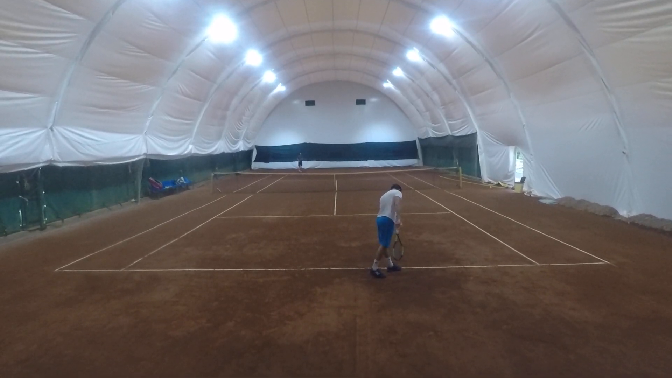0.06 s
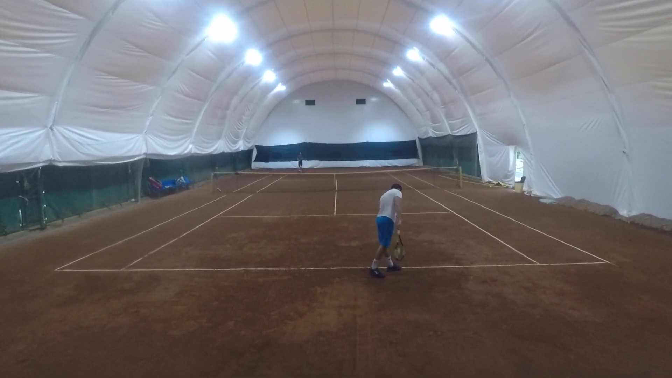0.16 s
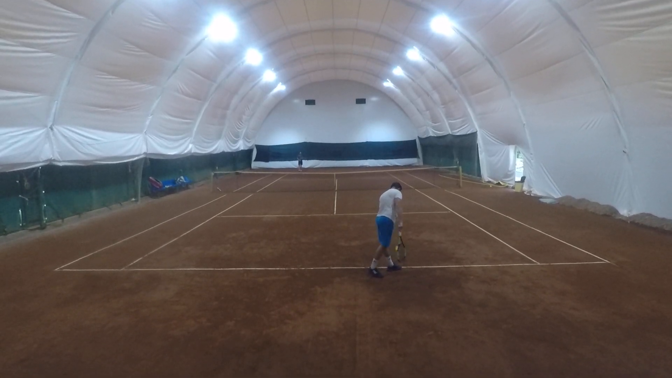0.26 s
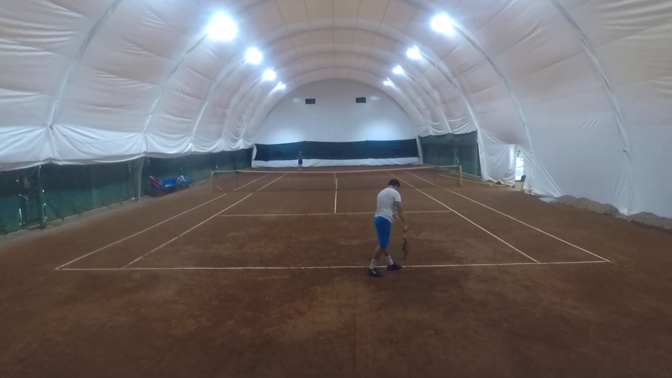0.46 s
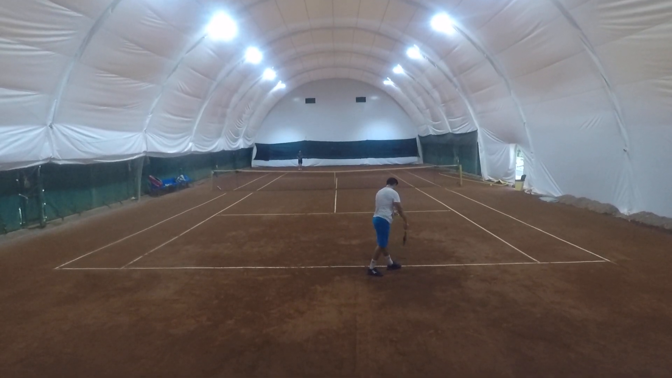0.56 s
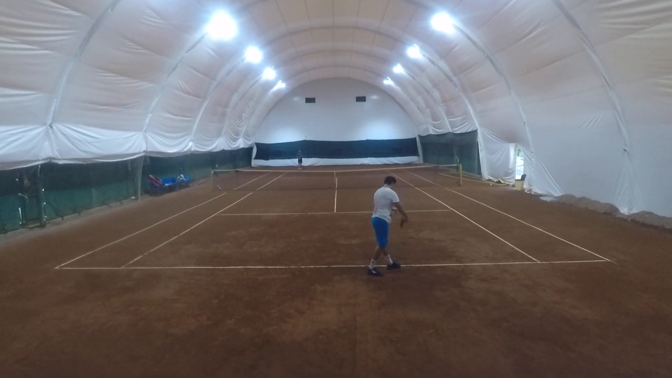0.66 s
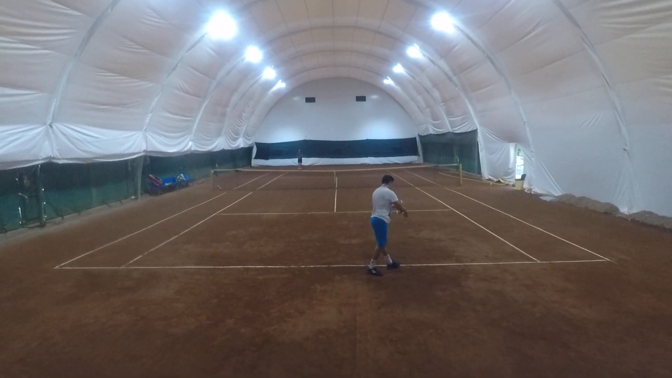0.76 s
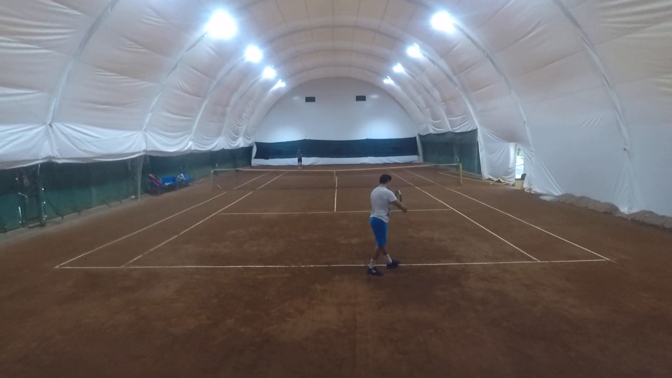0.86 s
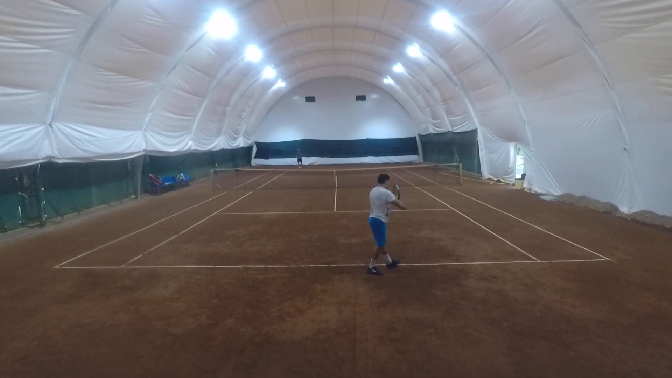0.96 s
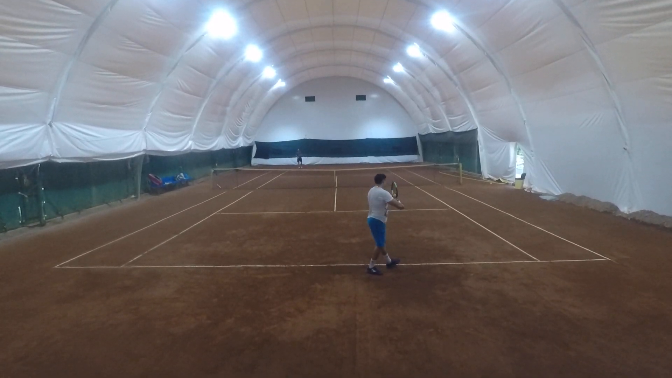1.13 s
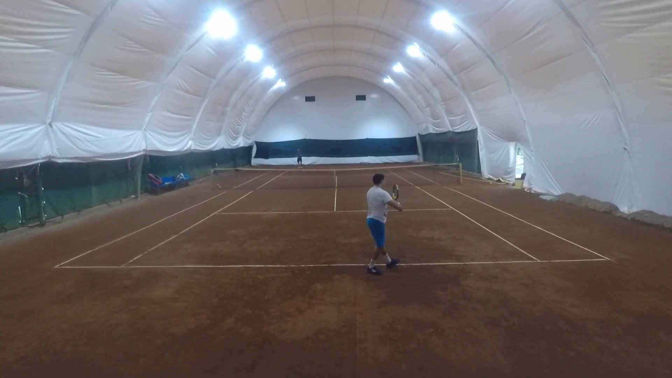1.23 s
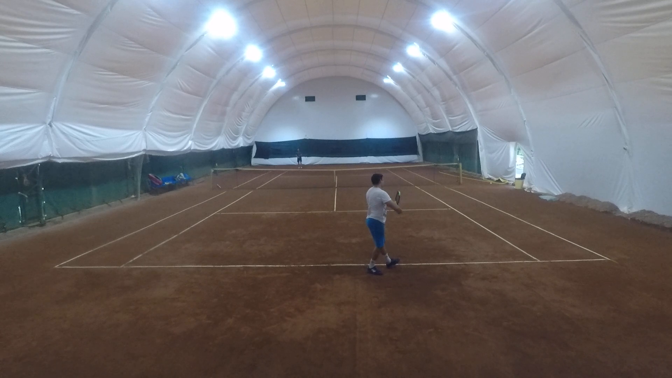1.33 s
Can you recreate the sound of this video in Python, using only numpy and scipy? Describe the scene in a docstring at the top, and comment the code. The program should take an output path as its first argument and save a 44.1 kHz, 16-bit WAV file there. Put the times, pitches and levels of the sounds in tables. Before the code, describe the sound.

A tennis ball bounces with a dull hollow slap on clay, a racket hit follows at once, and clattering echoes build to one loud pock, then fade over faint blower air; microphone stands some way behind.

```python
"""Inside an air-supported dome, a shoe shifts, a tennis ball bounces on clay and a racket strikes it.
Ball and racket are sums of damped modes; slaps, a snap and fizz add filtered clicks and noise.
The vault returns the blow as echoes that focus into one loud report and flutter away.
Shaped noise makes the blower air, hiss and draught under a pulsed whine and a low throb.
Small ticks close to the microphone join a click, a fizz and a brief high ring."""
import sys
import numpy as np
from scipy import signal
from scipy.fft import rfft, irfft
from scipy.io import wavfile
from scipy.ndimage import map_coordinates

SR = 44100
rng = np.random.default_rng(int(sys.argv[2]) if len(sys.argv) > 2 else 0)


def unload_wav(signal):
    """Save mono or channel-first audio to the path in sys.argv[1] as 16-bit WAV at rate SR, clipped to [-1, 1]."""
    wavfile.write(
        sys.argv[1],
        SR,
        np.round(np.clip(np.atleast_2d(signal).T, -1, 1) * 32767).astype(np.int16),
    )


N = 61740  # samples: 1.4 s

# Levels are relative within each stage: later filters and gains act on them too.
# T60 is the time to fall by 60 dB; the two ports are the left and right microphone openings.

# blower air spectrum: f/Hz, level/dB
AIR_SPECTRUM = [(70, -46), (105, -26), (140, 5.5), (200, 3.5), (300, -2), (430, -2.5), (700, -12),
                (1000, 1), (1400, -9), (2000, -15.5), (3500, -30), (7000, -49), (14000, -72)]
# blower air strength: t/s, level/dB
AIR_LEVEL = [(0, -35), (.15, -36), (.19, -39.5), (.23, -34.5), (.6, -35), (1, -41.5), (1.2, -42.5),
             (1.4, -44.5)]
# likeness of blower air at the two ports: f/Hz, correlation/1
AIR_ALIKE = [(100, 0.39), (250, 0.45), (600, -0.29), (1300, -0.022), (3000, 0.49), (8000, 0.61)]
# steady hiss spectrum: f/Hz, level/dB
HISS_SPECTRUM = [(1000, 3.5), (4000, -5.5), (6500, -1.5), (8500, -3), (11000, -9), (14500, -22.5)]
HISS_DB = -56
# draught spectrum at the microphone: f/Hz, level/dB
DRAUGHT_SPECTRUM = [(20, 2.5), (35, 6), (60, 2.5), (100, 7.5), (200, -15), (400, -31), (1000, -63)]
# draught strength: t/s, level/dB
DRAUGHT_LEVEL = [(0, -40.5), (.1, -87), (.45, -73), (.55, -47), (.68, -38.5), (.8, -44), (1.1, -44.5),
                 (1.4, -55)]
DRAUGHT_PUFF_DB, DRAUGHT_PUFFS_PER_S = 1.5, 25  # spread of the puffs, random knots a second
WHINE_HZ, WHINE_DB = 8570, -57.5
WHINE_PER_S, FIRST_BLIP_S, BLIP_S = 29.9, .008, 0.0025  # BLIP_S: half width at 1/e

# a shoe shifting on the clay, strength: t/s, level/dB
SHUFFLE_LEVEL = [(.16, -69), (.18, -30.5), (.2, -32), (.225, -51), (.25, -74)]
# its spectrum: f/Hz, level/dB
SHUFFLE_SPECTRUM = [(80, -39), (150, -9), (200, 14), (300, -16), (370, -40), (435, 15.5), (500, -0.5),
                    (700, -4.5), (1400, -3), (2500, -19.5), (8000, -51)]

# small ticks: t/s, level/dB
TICKS = [(0.1967, -35.5), (1.025, -45), (1.167, -27.5)]
# tick spectrum: f/Hz, level/dB
TICK_SPECTRUM = [(500, -18), (2000, -18), (2700, 3.5), (4500, -5), (5500, 2.5), (6300, 6), (7000, 1),
                 (7800, -13), (13000, -26)]
TICK_FIZZ_DB, TICK_RISE_S, TICK_T60_S = -5, 0.0012, 0.009
TICK_RING_HZ, TICK_RING_DB, TICK_RING_T60_S = 6260, -15.5, 0.017

# modes of the bouncing ball: f/Hz, level/dB, T60/s
BALL = [(255, 3.5, 0.025), (350, -18, 0.02), (1080, 0, 0.016), (1450, -5, 0.0097), (2150, -9, 0.006)]
BOUNCE_S, BOUNCE_DB = .2415, -18.5
# hollow slaps after the bounce: t/s, level/dB
SLAPS = [(0.2658, -18.5), (0.2686, -20), (0.2723, -27), (0.2805, -23.5), (0.2829, -25)]
# modes of each slap: f/Hz, level/dB, T60/s
SLAP_RING = [(192, -1, 0.047), (480, -10.5, 0.034), (1006, -27, 0.076), (1156, -2, 0.021),
             (1420, -5.5, 0.014), (1680, -2, 0.0075), (2130, -14, 0.0078)]
# filter of the soft contact, felt on clay: f/Hz, level/dB
SOFT_CONTACT = [(40, -35), (100, -62), (170, -0.5), (2400, -5.5), (3600, -18), (9000, -10)]
# clay crunching under each slap: f/Hz, level/dB
GRIT_SPECTRUM = [(300, -28), (900, 5), (1400, 1.5), (2400, -9.5), (3400, -12), (4500, -28), (8000, -44)]
GRIT_DB, GRIT_RISE_S, GRIT_T60_S = -8.5, .0005, .017

# reverberation time of the dome: f/Hz, T60/s
DOME_T60 = [(150, 1.32), (450, 1.14), (1000, 1.62), (2500, 2.2), (8000, 1.52)]
DOME_DB = -15

# modes of the racket: f/Hz, level/dB, T60/s
RACKET = [(145, -17, 0.1), (242, 4, 0.023), (455, -11.5, 0.072), (1410, -7, 0.0073), (2510, -5.5, 0.012)]
STRIKE_S, STRIKE_DB = .3012, -25
# spectrum of the racket's crack: f/Hz, level/dB
CRACK_SPECTRUM = [(300, -15), (2000, 9), (6000, 14), (9000, -9), (11500, -25), (14000, -39)]
SNAP_DB, CRACK_DB, CRACK_T60_S = -36, -36.5, 0.016  # sharp front, and its fizz
# filter that thins the lowest bass: f/Hz, level/dB
BASS_CUT = [(50, -17.5), (95, -28.5), (130, 5)]

# echoes of the blow: t/s, clack level/dB, thud level/dB, string level/dB
ECHOES = [(0.309, -30, -18.5, -35), (.315, -25.5, -18, -21.5), (.327, -27.5, -17, -20),
          (0.336, -32.5, -19, -24.5), (.347, -30, -23, -26.5), (.355, -28, -29, -18.5),
          (.365, -28, -12, -18.5), (0.382, -29, -27, -24), (0.389, -35, -26, -27),
          (0.4246, -24.5, -12.5, -17.5), (0.446, -33, -24, -20.5), (0.4566, -24, -14, -20),
          (.464, -53, -48, -23.5), (.501, -25.5, -27, -22.5), (0.5141, -24, -21, -9), (.523, -25, -24, -28),
          (.528, -13, -11, -13), (.533, -16, -10.5, -11), (.540, -24, -31, -22.5), (.547, -35, -18, -23),
          (.557, -32, -17.5, -18.5), (.569, -22.5, -28, -28.5), (0.58, -23, -16.5, -15.5),
          (0.592, -26.5, -19.5, -48), (.622, -26.5, -14, -18), (.634, -29, -50, -21),
          (.645, -33, -17, -19.5), (.657, -28.5, -17.5, -21), (.677, -47, -25.5, -24.5),
          (0.725, -35.5, -21.5, -31), (0.751, -38.5, -27, -41), (0.768, -34, -24.5, -38),
          (.81, -43, -30, -37), (0.85, -40.5, -25, -28.5)]
# resonances of the thud: f/Hz, width/Hz, level/dB
THUD = [(146, 14, -5.5), (184, 57, -16), (241, 13.7, -15.5)]
# resonances of the strings: f/Hz, width/Hz, level/dB
STRINGS = [(438, 20.2, 7.5), (498, 19, 5), (552, 110, 1), (604.6, 35, -4.5), (807, 71, -2)]
# spectrum of the clack: f/Hz, level/dB
CLACK_SPECTRUM = [(400, -44), (700, -12), (980, 5.5), (1080, -6.5), (1220, 0), (1450, -5.5), (1650, -4.5),
                  (1950, -16.5), (2400, -13), (3100, -22.5), (3700, -26), (6000, -32), (15000, -65)]
# resonances added to the clack: f/Hz, width/Hz, level/dB
CLACK_RING = [(1187, 39, 3.5), (1401, 61, 6), (1550, 82, -7.5), (2320, 340, -5), (2480, 100, -8.5),
              (3062, 95, 7)]
THUD_DB, STRINGS_DB, CLACK_DB = -2, -1.5, 0
# norm of the scattered wake behind each echo, over its front
THUD_SCATTER, STRINGS_SCATTER, CLACK_SCATTER = 0.31, 0.88, 0.91
SCATTER_T60_S = 0.049
# likeness of vault sound at the two ports: f/Hz, correlation/1 (held within -1 to 1 in use)
VAULT_ALIKE = [(150, 1), (500, 1.26), (1000, 1.06), (1600, 1.1), (2500, -1.97), (6000, 0.4)]
# phase by which the left port leads: f/Hz, phase/rad
VAULT_PHASE = [(150, -1.5), (260, -2), (480, -2.5), (1000, -3), (1600, -2.5), (2600, -1.58), (6000, -4)]
# left level over right: f/Hz, level/dB
VAULT_PAN = [(140, 1), (260, 4.5), (470, 8.5), (750, -1), (1500, -1.5), (2500, 4.5), (6000, -4)]
FLUTTER_DB, FLUTTER_T60_S = -11.5, 0.43

# smeared treble of the echoes: f/Hz, level/dB
SPLASH_SPECTRUM = [(1500, -31), (3000, 3.5), (4800, -17), (5600, -8), (6200, -2.5), (7200, -6.5),
                   (8500, -13.5), (10500, -21), (14000, -69)]
SPLASH_DB, SPLASH_RISE_S, SPLASH_T60_S = -18, 0.0026, 0.074
CRACKLE_DB, CRACKLES_PER_S = 4.2, 400  # spread of the crackle, random knots a second

# notes that hang on between echoes: f/Hz, level over the thud column/dB, T60/s
LINGER = [(146, -17, 0.27), (438.3, -20, 0.26)]
LINGER_RISE_S, LINGER_DRIFT_RAD, LINGER_DRIFTS_PER_S = .008, .4, 10

# modes of the focused report: f/Hz, level/dB, T60/s
REPORT = [(153, -14.5, 0.13), (501.3, -19, 0.14), (1400, -21, 0.029), (1498, -19.5, 0.072),
          (2290, -20, 0.046), (2506, -28, .07), (3115, -32, 0.046)]
REPORT_S, REPORT_RISE_S = .5275, .005

THROB_FIRST_S, THROB_PERIOD_S = .6555, .1008
THROB_HZ, THROB_DB, THROB_RISE_S, THROB_T60_S = 68, -28, .005, .04

CEILING, TOP_HZ = .88, 14900  # full scale = 1; band limit


def amp(db):
    """Decibel law: 20 dB is a tenfold amplitude."""
    return 10 ** (np.asarray(db) / 20)


def unit(x):
    """Normalisation to a root-mean-square of 1."""
    return x / np.sqrt(np.mean(x ** 2) + 1e-20)


def along(points, hz):
    """Linear interpolation of (f, value) points over logarithmic frequency."""
    f, v = np.transpose(points)
    return np.interp(np.log(hz + 1), np.log(f + 1), v)


def level(rows):
    """Amplitude envelope, linear in decibels between (t, level) points."""
    return amp(np.interp(np.arange(N) / SR, *np.transpose(rows)))


def grid():
    """Frequencies of the zero-padded Fourier transform."""
    return np.fft.rfftfreq(2 * N, 1 / SR)


def filtered(x, response):
    """Linear filtering: convolution becomes multiplication in frequency."""
    return irfft(rfft(x, 2 * N) * response)[..., :N]


def causal(points):
    """Minimum-phase response from (f, level) points, by folding the cepstrum."""
    cepstrum = irfft(np.log(amp(along(points, grid()))))
    cepstrum[1:N] *= 2
    cepstrum[N + 1:] = 0
    return np.exp(rfft(cepstrum))


def resonant(peaks):
    """Superposed second-order resonances of given centre, width and level."""
    f = grid()
    return sum(amp(db) * 1j * f * width / (centre * centre - f * f + 1j * f * width)
               for centre, width, db in peaks)


def ports(pair, alike):
    """Interaural-style coherence: shared and differing signals mix by sum and difference."""
    turn = np.arccos(np.clip(along(alike, grid()), -1, 1)) / 2
    mid, side = filtered(pair, np.array([np.cos(turn), np.sin(turn)]))
    return np.array([mid + side, mid - side])


def placed(x, phase, pan):
    """Directional cues: a phase and a level difference split evenly between the ports."""
    half = np.array([[.5], [-.5]])
    return filtered(x, amp(half * along(pan, grid())) * np.exp(1j * half * along(phase, grid())))


def fade(s, t60):
    """Exponential decay of a damped system, starting abruptly at s."""
    t = np.arange(N) / SR - s
    return (t >= 0) * amp(-60 * np.abs(t) / t60)


def burst(s, rise, t60):
    """Exponential decay with a rounded, Gaussian-law onset."""
    t = np.maximum(np.arange(N) / SR - s, 0)
    onset = 1 - np.exp(-np.minimum(t / rise, 10) ** 2)
    return np.exp(-np.log(1000) * t / t60) * onset


def ring(s, modes):
    """Modal superposition: damped sinusoids struck at s."""
    t = np.arange(N) / SR - s
    return sum(amp(db) * fade(s, t60) * np.sin(2 * np.pi * hz * t) for hz, db, t60 in modes)


def snap(s, spectrum):
    """Impulse response of a coloured click, scaled to peak 1."""
    impulse = 1.0 * (np.arange(N) == round(s * SR))
    x = filtered(impulse, causal(spectrum))
    return x / np.abs(x).max()


def noise(spectrum):
    """Spectral shaping of two independent Gaussian noises, jointly of rms 1."""
    return unit(filtered(rng.standard_normal((2, N)), amp(along(spectrum, grid()))))


def wobble(rate):
    """Spline interpolation through random knots, rate of them a second."""
    return map_coordinates(rng.standard_normal(N // 100), [np.arange(N) * rate / SR])


def air():
    """Broadband flow noise: blower rush, low puffing draught and hiss, with a pulsed sine whine."""
    t = np.arange(N) / SR
    rush = level(AIR_LEVEL) * unit(ports(noise(AIR_SPECTRUM), AIR_ALIKE))
    puffs = amp(DRAUGHT_PUFF_DB * wobble(DRAUGHT_PUFFS_PER_S))
    low_noise = ports(noise(DRAUGHT_SPECTRUM), [(30, 0.63), (55, 0.26), (100, 0.19)])
    draught = level(DRAUGHT_LEVEL) * unit(puffs * low_noise)
    hiss = amp(HISS_DB) * noise(HISS_SPECTRUM)
    from_blip_s = (((t - FIRST_BLIP_S) * WHINE_PER_S + .5) % 1 - .5) / WHINE_PER_S
    blips = np.exp(-(from_blip_s / BLIP_S) ** 2)
    whine = amp(WHINE_DB) * np.sin(2 * np.pi * WHINE_HZ * t) * blips
    return rush + draught + hiss + whine


def shuffle():
    """Friction noise: a shoe's short dull scuff, as shaped noise under an envelope."""
    scuff = unit(ports(noise(SHUFFLE_SPECTRUM), VAULT_ALIKE))
    return level(SHUFFLE_LEVEL) * placed(scuff, VAULT_PHASE, VAULT_PAN)


def ticks():
    """Impulsive excitation: small bright ticks of a broad snap, a little fizz and one high mode."""
    fizz = amp(TICK_FIZZ_DB) * noise(TICK_SPECTRUM)
    mode = [(TICK_RING_HZ, TICK_RING_DB, TICK_RING_T60_S)]
    total = 0
    for s, db in TICKS:
        tick = snap(s, TICK_SPECTRUM) + fizz * burst(s, TICK_RISE_S, TICK_T60_S) + ring(s, mode)
        total = total + amp(db) * tick
    return total


def bounce():
    """Modal impact: the ball thumps on clay, then hollow slaps ring with gritty noise."""
    thump = amp(BOUNCE_DB) * ring(BOUNCE_S, BALL)
    slaps = sum(amp(db) * ring(s, SLAP_RING) for s, db in SLAPS)
    crunches = sum(amp(db) * burst(s, GRIT_RISE_S, GRIT_T60_S) for s, db in SLAPS)
    grit = amp(GRIT_DB) * noise(GRIT_SPECTRUM) * crunches
    impact = filtered(thump + slaps, causal(SOFT_CONTACT))
    phase = [(250, 0.098), (500, -1.4), (1000, 1.94), (2500, 0.12)]
    pan = [(250, -3), (500, 8), (1000, -9.0), (2500, 3)]
    return grit + placed(impact, phase, pan)


def dome(x):
    """Diffuse reverberation: convolution with noise whose decay depends on frequency."""
    hz, t, z = signal.stft(rng.standard_normal((2, N)), SR, nperseg=256)
    decay = amp(-60 * t / along(DOME_T60, hz)[:, None])
    tail = signal.istft(z * decay, SR)[1]
    return signal.fftconvolve(x, tail / np.linalg.norm(tail[0]), axes=1)[:, :N]


def strike():
    """Direct radiation of the racket: a short modal ring, an impulsive snap and a decaying fizz."""
    body = placed(-ring(STRIKE_S, RACKET), [(200, 0.52), (1400, 2.0), (2500, 0.9)], [(200, 4.7), (2500, 1)])
    body = filtered(amp(STRIKE_DB) * body, causal(BASS_CUT))
    fizz = amp(CRACK_DB) * fade(STRIKE_S, CRACK_T60_S) * noise(CRACK_SPECTRUM)
    crack = amp(SNAP_DB) * snap(STRIKE_S, CRACK_SPECTRUM) + fizz
    return body + placed(crack, [(2500, 0.81), (6000, 2.5)], [(2500, 21), (6000, -17.0)])


def echoes():
    """Reflection and scattering: sharp fronts with noisy wakes excite clack, thud and string bodies."""
    clack = causal(CLACK_SPECTRUM) * (1 + resonant(CLACK_RING))
    thud_band = causal(BASS_CUT) * causal([(300, -5), (600, -0.5), (2000, -56.5)])
    string_band = causal([(150, -18.5), (380, -2.5), (750, -6.5), (1500, -26), (5000, -37.5)])
    parts = [(clack, CLACK_DB, CLACK_SCATTER),  # in the column order of ECHOES
             (resonant(THUD) * thud_band, THUD_DB, THUD_SCATTER),
             (resonant(STRINGS) * string_band, STRINGS_DB, STRINGS_SCATTER)]
    t = np.arange(SR // 10) / SR
    pair = np.zeros((2, N))  # shared and differing signals
    for k, (body, part_db, scatter) in enumerate(parts):
        hits = np.zeros((2, N))
        for s, *dbs in ECHOES:
            wake = amp(-60 * t / SCATTER_T60_S) * rng.standard_normal((2, len(t)))
            norms = np.linalg.norm(wake, axis=1, keepdims=True)
            wake *= [[scatter], [np.hypot(1, scatter)]] / norms
            wake[0, 0] += 1  # the sharp front
            hits[:, round(s * SR):][:, :len(t)] += amp(dbs[k] + part_db) * wake
        onset = irfft(body)[:SR // 100]  # the first 10 ms set the scale
        pair += filtered(hits, body) / np.std(onset) / 2
    pair = pair + amp(FLUTTER_DB) * flutter(pair)
    return placed(ports(pair, VAULT_ALIKE), VAULT_PHASE, VAULT_PAN)


def flutter(pair):
    """Dense multiple reflection: a decaying noise tail, 5.8 ms late, keeps the vault's direction."""
    tail = fade(0.0058, FLUTTER_T60_S) * rng.standard_normal(N)
    return signal.fftconvolve(pair, tail[None] / np.linalg.norm(tail), axes=1)[:, :N]


def splash():
    """Diffuse scattering: wrinkled fabric smears each echo's treble into a short, crackling hiss."""
    power = sum((amp(db) * burst(s, SPLASH_RISE_S, SPLASH_T60_S)) ** 2 for s, db, *_ in ECHOES)
    crackle = unit(amp(CRACKLE_DB * wobble(CRACKLES_PER_S)))
    hiss = placed(noise(SPLASH_SPECTRUM), VAULT_PHASE, VAULT_PAN)
    return amp(SPLASH_DB) * np.sqrt(power) * crackle * hiss


def linger():
    """Energy storage: each echo feeds low notes of racket frame and strings, which decay with drifting phase."""
    t, x = np.arange(N) / SR, np.zeros(N)
    for hz, note_db, t60 in LINGER:
        power = sum((amp(db) * burst(s, LINGER_RISE_S, t60)) ** 2 for s, _, db, _ in ECHOES)
        drift = LINGER_DRIFT_RAD * wobble(LINGER_DRIFTS_PER_S)
        x += amp(note_db) * np.sqrt(power) * np.sin(2 * np.pi * hz * t + drift)
    return placed(x, VAULT_PHASE, VAULT_PAN)


def report():
    """Focusing by a concave vault: ball and racket modes return as one loud, pitched pock."""
    t = np.arange(N) / SR - REPORT_S
    pock = sum(amp(db) * burst(REPORT_S, REPORT_RISE_S, t60) * np.sin(2 * np.pi * hz * t)
               for hz, db, t60 in REPORT)
    phase = [(150, -1.3), (500, -2.5), (1500, -2.6), (2500, 3.1)]
    return placed(filtered(pock, causal(BASS_CUT)), phase, VAULT_PAN)


def throb():
    """Periodic excitation: a soft low damped sine at the microphone, about ten times a second."""
    t = np.arange(N) / SR
    starts = np.arange(THROB_FIRST_S, N / SR, THROB_PERIOD_S)
    return amp(THROB_DB) * sum(burst(s, THROB_RISE_S, THROB_T60_S) * np.sin(2 * np.pi * THROB_HZ * (t - s))
                               for s in starts)


def scene():
    """Superposition: bounce, blow and echoes excite the dome, and the other sounds add to them."""
    play = bounce() + strike() + echoes() + splash() + report()
    reverberant = play + amp(DOME_DB) * dome(play)
    return air() + shuffle() + ticks() + reverberant + linger() + throb()


def record(dry):
    """Soft saturation rounds the highest peaks, then a sharp low-pass limits the band."""
    rounded = dry / (1 + np.abs(dry / CEILING) ** 6) ** (1 / 6)
    return filtered(rounded, grid() < TOP_HZ)


dry = scene()
out = record(dry)
unload_wav(out)
```